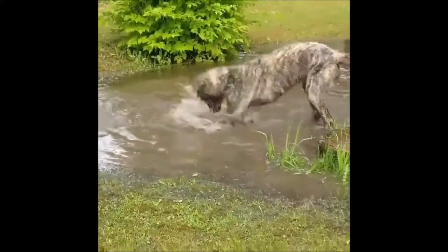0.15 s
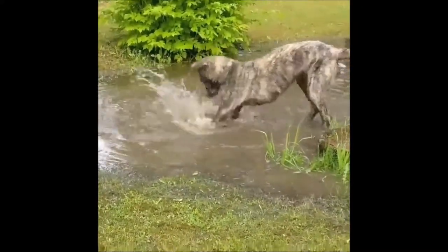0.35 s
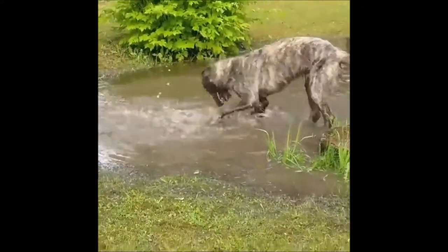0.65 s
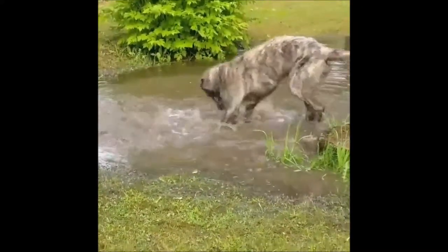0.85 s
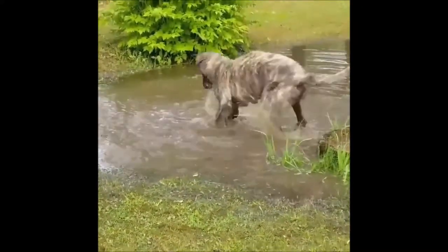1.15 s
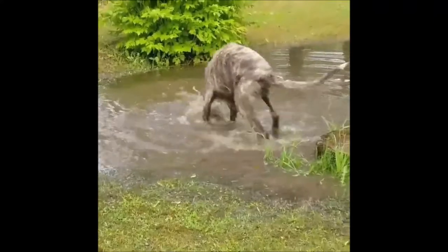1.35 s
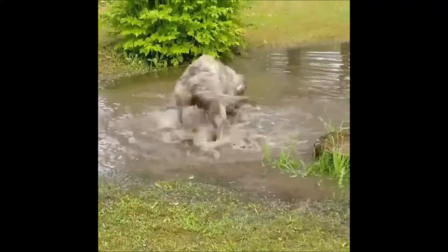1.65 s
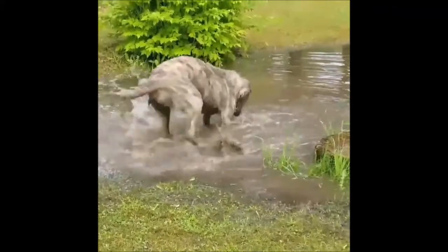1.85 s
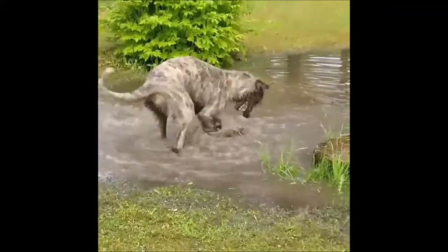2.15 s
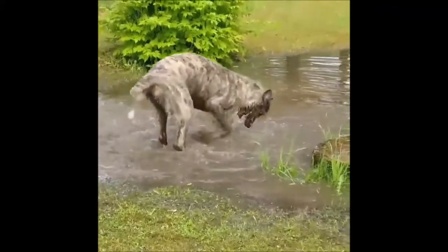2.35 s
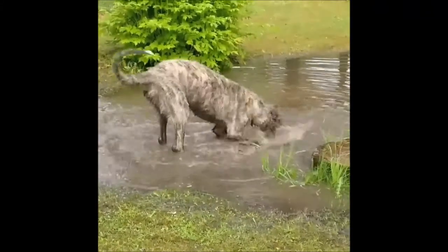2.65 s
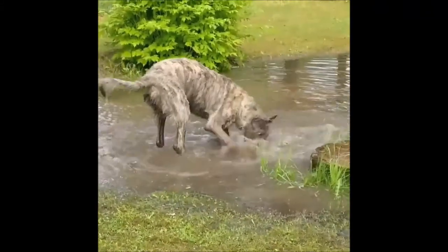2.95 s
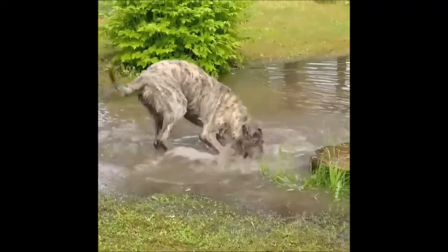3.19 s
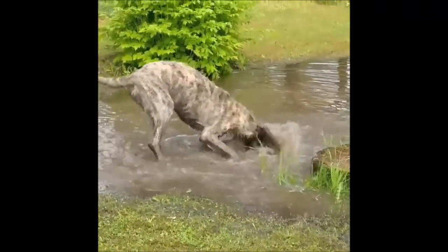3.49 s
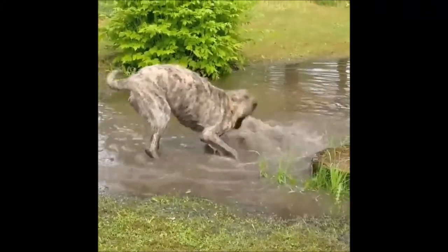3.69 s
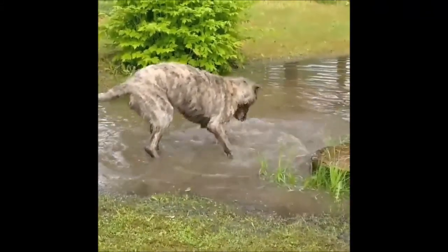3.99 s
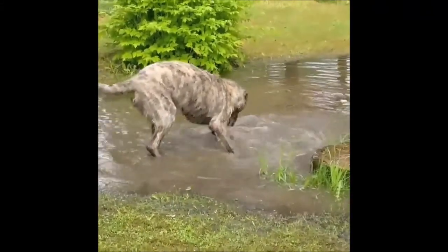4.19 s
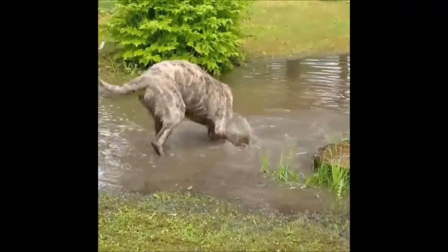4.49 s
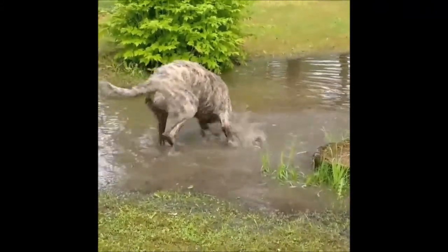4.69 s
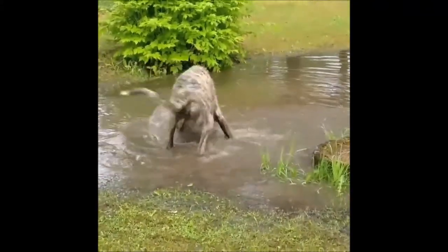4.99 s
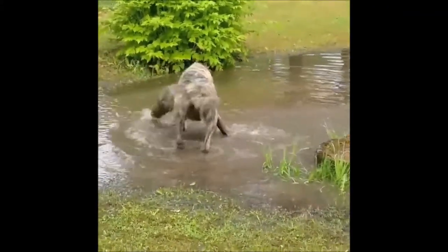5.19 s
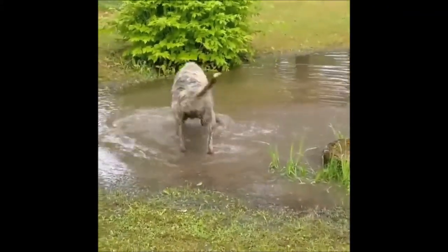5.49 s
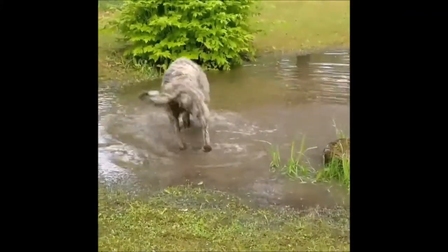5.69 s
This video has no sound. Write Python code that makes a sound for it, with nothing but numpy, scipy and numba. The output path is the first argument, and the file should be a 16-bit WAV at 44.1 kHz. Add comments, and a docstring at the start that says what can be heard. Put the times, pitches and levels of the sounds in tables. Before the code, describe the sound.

Shallow water splashes, sloshes and bubbles continuously as a large dog slaps its paws around a puddle on a lawn.

```python
"""A shallow puddle on a lawn, one microphone a few metres off. A big dog paws, stamps and dips its muzzle.
Each paw slaps the surface and drags air under: big pockets gulp, small bubbles ring, and thrown water
patters back as spray. The churned water never quite settles. It reaches the microphone with early
echoes and a slightly hollow colour; faint outdoor air lies underneath."""
import sys
import numpy as np
from scipy import signal
from scipy.fft import rfft, irfft
from scipy.io import wavfile
from scipy.ndimage import uniform_filter1d
from numba import njit

SR = 44100
rng = np.random.default_rng(int(sys.argv[2]) if len(sys.argv) > 2 else 0)


def bounce(signal):
    """Save signal as a 16-bit WAV file at the path given by the first command-line argument."""
    frames = np.transpose(np.atleast_2d(signal))
    limited = np.clip(frames, -1, 1)
    pcm = np.round(limited * 32767).astype(np.int16)
    wavfile.write(sys.argv[1], SR, pcm)


N = 257544
TIME = np.arange(N) / SR
STROKE_ATTACK_S = 0.01

# Mid-sized bubbles, from slaps and churning alike. Each row: pitch in Hz, relative level in dB.
BUBBLE_SPECTRUM = [(560, -13), (720, 1), (900, -6), (1100, -1), (1400, -12)]


def slaps(wash_db, wash_s):
    """Each slap tears a dense cloud of short-lived bubbles into the water and leaves a brief wash."""
    # Paws and sheets of water landing. Each row: peak time in seconds, half length in seconds,
    # then relative levels of bubbles, fizz and hiss in dB.
    landings = [(0.003, 0.0034, -52, -45, -68), (0.062, 0.003, -58, -33, -47.5),
                (0.136, 0.0054, -38, -38, -49.5), (0.186, 0.0058, -27.5, -27, -41),
                (0.216, 0.0066, -40, -56, -64), (0.282, 0.0085, -41.5, -62, -68),
                (0.348, 0.032, -44, -38, -49.5), (0.618, 0.011, -39, -42, -63),
                (0.74, 0.011, -49, -34.5, -48.5), (0.779, 0.011, -38, -33, -48.5),
                (0.861, 0.012, -45, -33, -53), (0.92, 0.012, -42, -38.5, -50.5),
                (0.999, 0.005, -57, -37, -71), (1.045, 0.0083, -44, -39, -50.5),
                (1.115, 0.0074, -37.5, -58, -58), (1.174, 0.016, -42, -43, -58),
                (1.246, 0.0087, -43, -47, -54), (1.326, 0.014, -40.5, -47, -60),
                (1.354, 0.0048, -38, -35, -43.5), (1.421, 0.004, -38, -48, -57),
                (1.438, 0.0057, -36, -35, -45.5), (1.517, 0.0066, -41, -38, -64),
                (1.553, 0.0071, -60, -34, -48), (1.759, 0.022, -36, -37, -49.5),
                (1.85, 0.024, -40, -52, -52.5), (1.898, 0.005, -35, -44, -47),
                (1.942, 0.013, -37.5, -45, -50), (2.049, 0.0053, -48, -39, -56),
                (2.411, 0.0095, -60, -36.5, -68), (2.507, 0.0087, -43, -39, -60),
                (2.572, 0.005, -60, -35.5, -48), (2.633, 0.0076, -39, -41, -50),
                (2.668, 0.017, -52, -37, -59), (2.755, 0.0055, -43, -34, -49.5),
                (2.771, 0.0026, -55, -36, -57), (2.798, 0.0045, -57, -39, -62),
                (2.91, 0.027, -57, -40.5, -57), (2.942, 0.0012, -49, -31, -38.5),
                (3.23, 0.0082, -54, -47, -63), (3.271, 0.01, -45.5, -42, -53),
                (3.301, 0.014, -64, -36.5, -58), (3.413, 0.0074, -48, -40.5, -68),
                (3.446, 0.009, -53, -39, -53.5), (3.573, 0.012, -42, -40, -71),
                (3.606, 0.015, -45.5, -37.5, -68), (3.735, 0.0035, -43, -41, -62),
                (3.85, 0.0046, -46, -38, -53), (4.101, 0.0056, -45.5, -37, -67),
                (4.257, 0.0035, -57, -46, -65), (4.532, 0.0041, -33.5, -32.5, -55),
                (4.542, 0.0039, -46, -35, -45), (4.773, 0.005, -48, -41, -51.5),
                (4.817, 0.018, -46.5, -42.5, -56.5), (4.91, 0.0078, -40.5, -42, -56),
                (4.94, 0.013, -40.5, -37, -46.5), (5.062, 0.0056, -41, -60, -63),
                (5.087, 0.015, -43.5, -39.5, -58), (5.309, 0.011, -45.5, -49, -52),
                (5.339, 0.0068, -45, -51, -62), (5.444, 0.0059, -49, -44, -72),
                (5.652, 0.0054, -38.5, -42, -58), (5.699, 0.006, -47, -63, -64)]
    # The small bubbles torn in. Each row: pitch in Hz, relative level in dB.
    torn_spectrum = [(1100, 5), (1350, -9.5), (1680, 12.5), (2100, -19.5), (2500, 10.5), (3200, 0),
                     (4500, 1.5)]
    power = np.zeros((3, N))
    for s, half_length, *levels in landings:
        near = slice(max(0, int((s - .1) * SR)), int((s + .2) * SR))
        t = TIME[near] - s
        burst = np.exp(-(t / half_length) ** 2)
        wash = from_db(wash_db) ** 2 * (t > 0) * np.exp(-np.abs(t) / wash_s)
        power[:, near] += from_db(levels)[:, None] ** 2 * (burst + wash)
    bubble_gain, fizz_gain, hiss_gain = np.sqrt(power)
    bubbles = swarm(BUBBLE_SPECTRUM, per_s=2700, cycles=7.7, spread_db=4.5, rise=0.053, swell_cycles=0.51)
    fizz = swarm(torn_spectrum, per_s=4400, cycles=18, spread_db=0, rise=0.081, swell_cycles=0.4)
    splat = from_db(-4.5) * noise_band(263, 790)  # the paw itself
    hiss = from_db(8.5) * noise_band(4650, 14700)  # the tearing sheet of water
    return bubble_gain * (bubbles + splat) + fizz_gain * fizz + hiss_gain * hiss


def churn(bubble_unrest, fizz_unrest):
    """Stirred water traps air: low pockets, ringing bubbles, stray plops and fizz."""
    # The largest and the smallest bubbles. Each row: pitch in Hz, relative level in dB.
    pocket_spectrum = [(125, -5), (185, -6.5), (260, 2.5), (370, 2.5), (500, -27)]
    fizz_spectrum = [(1300, -7), (1680, 2.5), (2100, -5.5), (2500, 5), (3200, 0), (3900, 2.5), (4700, -5)]
    stirred = stroke_gain("bubbles", decay_s=0.021)
    pocket_gain = np.hypot(from_db(-14) * bubble_unrest, stroke_gain("pockets", decay_s=0.029))
    bubble_gain = np.hypot(bubble_unrest, from_db(-1.5) * stirred)
    fizz_gain = np.hypot(fizz_unrest, from_db(-13) * stirred)
    pockets = swarm(pocket_spectrum, per_s=330, cycles=9.1, spread_db=2, rise=0.23, swell_cycles=3.4)
    bubbles = swarm(BUBBLE_SPECTRUM, per_s=900, cycles=9.3, spread_db=2, rise=0.15, swell_cycles=8.3)
    strays = swarm(BUBBLE_SPECTRUM, per_s=42, cycles=14, spread_db=0.5, rise=0.14, swell_cycles=1.9)
    fizz = swarm(fizz_spectrum, per_s=3000, cycles=55.6, spread_db=1.5, rise=0.1, swell_cycles=2.75)
    return pocket_gain * pockets + bubble_gain * (bubbles + from_db(-6.5) * strays) + fizz_gain * fizz


def plops():
    """Single bubbles ring out above the churn."""
    # Each row: time in seconds, relative peak in dB, pitch in Hz, cycles of ringing,
    # mean climb as a share of the pitch.
    loud_bubbles = [(0.0145, -28, 775, 6.7, 0.042), (0.029, -34, 1020, 32, 0.099),
                    (0.0604, -16, 2960, 30, 0.074), (0.161, -31, 790, 8.9, 0.11),
                    (0.3392, -29, 1870, 18, 0.13), (0.3422, -31, 920, 40, 0.041),
                    (0.402, -35.5, 734, 24, 0.0054), (0.488, -43, 1830, 18, 0.022),
                    (0.586, -30, 745, 12, 0), (0.6036, -25, 667, 17, 0.034),
                    (0.7004, -26.5, 740, 9.5, 0.086), (0.8441, -34.5, 610, 54, 0.036),
                    (0.911, -28, 880, 12, 0.13), (0.914, -26, 1600, 30, 0.17), (0.9992, -30, 1800, 36, 0),
                    (1.1304, -28.5, 1005, 18, 0.14), (1.149, -32, 900, 20, 0.35),
                    (1.165, -28, 1250, 26, 0.11), (1.171, -29, 1050, 14, 0.097),
                    (1.3489, -26, 2250, 24, 0.17), (1.4397, -24, 3400, 22, .05),
                    (1.535, -33, 1560, 16, 0.054), (1.575, -32, 1900, 22, 0.049),
                    (1.653, -34, 1640, 64, 0.0021), (2.042, -34, 1720, 18, 0),
                    (2.0783, -32, 1460, 45, 0.0039), (2.194, -34, 814, 24, 0.35),
                    (2.221, -33, 1000, 20, 0.022), (2.2359, -23, 2770, 11, 0),
                    (2.5665, -25, 1480, 15, 0.087), (2.5816, -27, 1620, 26, 0),
                    (2.6156, -30, 1190, 16, .05), (2.6238, -23, 790, 9.6, 0.17), (2.71, -33, 970, 16, 0.19),
                    (2.721, -33, 1700, 16, 0), (2.791, -32, 1780, 19, .1), (3.208, -38, 980, 57, 0.073),
                    (3.1209, -28.5, 1570, 6.5, 0.18), (3.303, -25.5, 2300, 28, 0.035),
                    (3.4551, -30.5, 1640, 60, 0.13), (3.5085, -30, 810, 17, 0.047),
                    (3.575, -31, 770, 19, 0.12), (3.776, -38, 900, 14, 0.17), (3.805, -37, 1020, 14, .1),
                    (3.833, -37, 850, 21, 0.051), (3.854, -35, 890, 11, 0), (3.9904, -37, 784, 17, 0.068),
                    (4.071, -35, 730, 11, 0), (4.165, -33, 740, 23, 0), (4.2545, -30, 980, 10, 0.01),
                    (4.3045, -35, 1100, 12, 0.018), (4.3245, -33, 1090, 13, 0.02),
                    (4.3355, -29, 1050, 22, 0.019), (4.351, -33, 1190, 9.9, .05),
                    (4.3585, -27, 1010, 19, 0.022), (4.376, -30, 965, 17, 0), (4.5287, -26, 1093, 27, 0.15),
                    (4.5417, -23.5, 1650, 27, 0.016), (4.601, -33, 3000, 36, 0), (4.646, -37, 870, 20, 0),
                    (4.661, -33, 840, 10, 0.66), (4.666, -34.5, 1610, 24, 0.45), (4.726, -37, 1900, 40, .1),
                    (4.7722, -27.5, 1560, 15, 0.047), (4.853, -37, 644, 8.9, 0.35),
                    (4.874, -37, 1760, 18, .15), (4.8929, -35, 990, 91, 0.12),
                    (5.013, -29.5, 666, 8.3, 0.092), (5.076, -23.5, 613, 3.7, 0),
                    (5.2825, -32.5, 660, 33, 0.077), (5.2835, -33, 2930, 76, 0.083),
                    (5.437, -40, 2300, 22, .1), (5.546, -36, 5270, 57, .05), (5.5609, -34, 800, 13, 0.18),
                    (5.574, -32.5, 1770, 14, 0.69), (5.577, -29, 2700, 22, 0), (5.6262, -28.5, 1610, 11, 0),
                    (5.632, -37, 1750, 18, 0.3), (5.806, -37, 3350, 30, .05), (5.819, -31, 2500, 22, 0.22)]
    return lone_bubbles(loud_bubbles, swell_cycles=2.51)


def gulps(cycles, rise):
    """The hollow behind a plunging paw closes into one big, quickly damped bubble."""
    # Each row: time in seconds, relative peak in dB, pitch in Hz.
    hollows = [(0.13, -36, 273), (0.182, -19, 284), (0.225, -32, 214), (0.269, -30, 253), (0.28, -25, 264),
               (0.727, -31, 250), (1.051, -28.5, 258), (1.135, -33, 386), (1.348, -25.5, 188),
               (1.366, -32, 346), (0.743, -30.5, 288), (0.812, -37, 262), (1.427, -31, 274),
               (1.816, -35.5, 283), (1.91, -33.5, 192), (2.525, -33.5, 262), (2.58, -34, 268),
               (2.621, -28.5, 350), (2.942, -36, 205), (3.015, -32.5, 242), (3.275, -33, 236),
               (3.446, -32, 310), (3.485, -33, 265), (3.502, -30, 290), (4.497, -25.5, 316),
               (4.818, -33.5, 350), (4.853, -31.5, 375), (5.022, -34, 402), (5.039, -29, 329),
               (5.069, -28, 376), (5.53, -40, 306), (5.568, -37, 302), (5.604, -36, 300)]
    return lone_bubbles([(*row, cycles, rise) for row in hollows], swell_cycles=1.26)


def smacks():
    """A flat hit on the water is one short midrange pressure pulse."""
    # Each row: time in seconds, peak in dB.
    flat_hits = [(0.1855, -20), (0.857, -21), (1.9082, -13.5), (2.868, -22.5), (4.532, -26), (4.772, -35),
                 (4.9305, -28)]
    return pulses(flat_hits, low_hz=810, high_hz=2180, lag_s=0.00062)


def gurgle(start_s, length_s, swell_db_per_s):
    """Bubbles of similar size break around the dipped muzzle, swelling until it is lifted."""
    # Each row: pitch in Hz, relative level in dB.
    gurgle_spectrum = [(700, -4), (960, 4), (1100, 6), (1250, 4), (1420, -9), (1750, 4), (2100, -4)]
    swell_db = swell_db_per_s * np.clip(TIME - start_s, 0, length_s)
    gain = from_db(-48.5 + swell_db) * envelope(start_s, STROKE_ATTACK_S, length_s, decay_s=0.013)
    return gain * swarm(gurgle_spectrum, per_s=900, cycles=16, spread_db=0, rise=0.034, swell_cycles=0.71)


def spray(unrest):
    """Thrown water lands after a short flight: droplets and mist merge, bigger drops patter through."""
    # Droplets and the finer mist. Each row: pitch in Hz, relative level in dB.
    droplet_spectrum = [(4600, 3), (5500, -2), (7000, 0), (8800, 1)]
    mist_spectrum = [(8400, -6.5), (10000, 1), (11200, 2.5), (13000, 1), (14500, -2)]
    thrown = stroke_gain("spray", decay_s=0.011, attack_s=0.018, delay_s=0.01)
    droplets = swarm(droplet_spectrum, per_s=3900, cycles=190, spread_db=4.5, rise=0.018, swell_cycles=8.3)
    mist = swarm(mist_spectrum, per_s=8000, cycles=160, spread_db=3.5, rise=0.034, swell_cycles=0.76)
    patter = swarm(mist_spectrum, per_s=45, cycles=12, spread_db=4, rise=0.03, swell_cycles=0.69)
    droplet_gain = from_db(-0.43) * np.hypot(slosh() * unrest, thrown)
    mist_gain = from_db(5 - 0.39 * TIME) * np.hypot(unrest, thrown)  # thins as the play goes on
    return droplet_gain * droplets + mist_gain * (from_db(-2) * mist + from_db(-10.5) * patter)


def ticks(edge_ratio):
    """Each drop landing near the microphone is one sharp pulse in a treble band of its own."""
    # Each row: time in seconds, peak in dB, band centre in Hz.
    close_drops = [(0.543, -30, 10000), (0.7618, -19, 10600), (0.9094, -24, 10000), (1.1665, -22, 10000),
                   (1.2555, -24, 10000), (1.44, -24, 10500), (1.852, -19.5, 10800), (2.0475, -22, 10100),
                   (2.9433, -17, 10900), (3.3896, -25, 10100), (4.055, -32, 8450), (4.306, -22, 12500),
                   (4.318, -17.5, 12400), (4.6595, -30, 10000), (4.6912, -22.5, 11900), (5.189, -27, 10000),
                   (5.3368, -26, 10000), (5.5423, -24, 11900), (5.547, -29, 8000)]
    return sum(pulses([(s, db)], hz / edge_ratio, hz * edge_ratio, lag_s=0.0011, order=3)
               for s, db, hz in close_drops)


def heave():
    """The mass of water pushed aside gives a soft low thud."""
    rumble = even_out(noise_band(53, 91.5), samples=3400, floor=0.15)
    return from_db(-6) * stroke_gain("heave", decay_s=0.04) * rumble


def stroke_gain(layer, decay_s, attack_s=STROKE_ATTACK_S, delay_s=0):
    """Gain of one layer as a paw or the muzzle ploughs through the water; overlaps add in power."""
    # Each row: start in seconds, length in seconds, then relative levels in dB of the four layers below.
    strokes = [(0.119, 0.19, -47.5, -61, -47.5, -55), (0.602, 0.12, -46, -59, -56, -50),
               (0.724, 0.066, -41, -41, -59, -57), (0.823, 0.042, -44, -54, -59, -64),
               (1.032, 0.13, -44.5, -43, -49, -50.5), (1.272, 0.09, -49, -50, -47, -62),
               (1.312, 0.097, -44.5, -44.5, -46, -45), (1.461, 0.072, -50, -42.5, -53, -54),
               (1.672, 0.072, -44, -54, -57, -50), (1.833, 0.11, -46.5, -55, -47, -51.5),
               (1.993, 0.049, -49.5, -57, -55, -48), (2.435, 0.046, -48, -66, -62, -53),
               (2.505, 0.15, -54, -62, -59, -53), (2.773, 0.18, -55.5, -64, -54, -49),
               (2.937, 0.15, -46, -70, -43.5, -75), (3.064, 0.23, -65, -66, -70, -48),
               (3.267, 0.058, -51, -58, -58, -60), (3.368, 0.058, -52, -49, -67, -59),
               (3.446, 0.062, -42.5, -65, -74, -67), (3.582, 0.048, -59, -50, -54, -47.5),
               (3.662, 0.21, -84, -51.5, -71, -53.5), (4.087, 0.048, -51, -57, -64, -48.5),
               (4.2, 0.21, -50.5, -54, -44.5, -56.5), (4.435, 0.12, -51.5, -45.5, -52, -53.5),
               (4.82, 0.2, -53, -54, -66, -54.5), (4.995, 0.11, -47, -48, -54, -67),
               (5.253, 0.023, -45, -43.5, -40, -58), (5.535, 0.017, -54, -58, -62, -75),
               (5.607, 0.057, -49, -47.5, -50, -54.5)]
    column = ("pockets", "bubbles", "heave", "spray").index(layer)
    power = sum((from_db(levels[column]) * envelope(s + delay_s, attack_s, length, decay_s)) ** 2
                for s, length, *levels in strokes)
    return np.sqrt(power)


def restless_water():
    """The puddle stays stirred up between strokes: gain curves for bubbles, fizz and spray."""
    # Each row: time in seconds, then relative levels of bubbles, fizz and spray in dB.
    unrest = [(0.0, -46.5, -40, -53.5), (0.25, -49, -41.5, -49), (0.33, -48, -49.5, -53),
              (0.45, -50.0, -43, -52.0), (0.6, -50, -42, -47.5), (0.73, -46, -39.5, -58),
              (0.86, -47, -43.5, -51.5), (0.97, -47, -42, -51), (1.06, -50, -40.5, -57.5),
              (1.26, -47, -40.5, -49.0), (1.4, -45.0, -37, -51), (1.56, -49, -41, -46.5),
              (1.62, -48.5, -42, -50), (1.7, -42, -40.5, -51), (1.8, -49, -37, -46.5),
              (1.93, -53, -37.5, -48), (2.07, -50.0, -38.5, -46.5), (2.15, -50, -44, -48.5),
              (2.24, -51, -41, -49.5), (2.35, -53.5, -45.5, -50), (2.57, -50.5, -40, -47.5),
              (2.73, -49, -41.5, -47.5), (2.87, -50, -40, -51), (2.97, -48.5, -41.5, -51.5),
              (3.05, -52, -47.0, -55), (3.15, -50.5, -43.5, -58.0), (3.21, -53.5, -41, -56.5),
              (3.31, -50, -43.0, -52), (3.67, -50.5, -43.5, -51.5), (3.8, -56, -43.5, -56),
              (3.91, -54, -45.5, -53), (4.04, -56.5, -51.5, -59), (4.13, -52, -45, -56.5),
              (4.19, -46.5, -46.5, -58.0), (4.3, -51, -46, -57), (4.39, -46, -43, -62),
              (4.44, -57.0, -46.0, -57.0), (4.57, -57, -40, -51.5), (4.69, -51, -47.5, -56),
              (4.81, -47, -44.5, -58.0), (4.96, -50, -44.5, -55), (5.12, -48.5, -43.5, -51.0),
              (5.39, -55.5, -47.5, -54.5), (5.54, -53, -46, -53.5), (5.6, -55, -48.5, -63.5),
              (5.7, -57, -46.5, -61), (5.8, -59.5, -49.5, -64.5)]
    times, *columns = np.transpose(unrest)
    return [from_db(np.interp(TIME, times, db)) for db in columns]


def slosh(depth_db=1.5, per_s=30):
    """A random gain that swells and sinks with each wavelet."""
    return from_db(depth_db * wander(per_s, points=1000))


def swarm(spectrum, per_s, cycles, spread_db, rise, swell_cycles):
    """Bubbles of one size class born at random, rms 1; spread_db makes a few louder than the rest."""
    low_hz, high_hz = spectrum[0][0], spectrum[-1][0]
    draws = np.random.default_rng(rng.integers(2 ** 31)).random((int(per_s * N / SR), 4))
    when, pitch, size, life = draws.T
    hz = low_hz * (high_hz / low_hz) ** pitch
    boost_db = spread_db * np.minimum(-np.log(1 - size), 4)
    heights = from_db(at_hz(spectrum, hz) + boost_db) * np.sqrt(hz)
    heights[::2] *= -1
    starts = (when * N).astype(np.int64)
    lives = cycles * 2 ** (2 * life - 1) * SR / hz
    rings = ring_bubbles(starts, 2 * np.pi * hz / SR, heights, lives, 2 * np.pi * swell_cycles, rise, N)
    rings = rms_one(band(rings, low_hz * 0.6, high_hz * 0.99))
    # the trapped air is shared out evenly over a few hundredths of a second
    return rms_one(even_out(rings, samples=900, floor=0.17))


@njit
def ring_bubbles(starts, radians_per_sample, heights, lives, swell_radians, rise, length):
    """Each bubble swells, then dies away by 60 dB over its life in samples while its pitch climbs."""
    out = np.zeros(length)
    for k in range(len(starts)):
        for i in range(min(int(lives[k]), length - starts[k])):
            age, phase = i / lives[k], radians_per_sample[k] * i
            height = heights[k] * min(1., phase / swell_radians) * np.exp(-np.log(1000) * age)
            out[starts[k] + i] += height * np.sin(phase * (1 + rise * age))
    return out


def lone_bubbles(rows, swell_cycles):
    """A large bubble pinches off over a cycle or two, then rings down while its pitch climbs."""
    out = np.zeros(N)
    for s, peak_db, hz, cycles, rise in rows:
        turn = np.arange(int(cycles * SR / hz)) * hz / SR
        shape = (1 - np.exp(-(turn / swell_cycles) ** 2)) * from_db(-60 * turn / cycles)
        ring = shape / shape.max() * np.sin(2 * np.pi * turn * (1 + rise * turn / cycles))
        add(out, s - 0.35 * swell_cycles / hz, from_db(peak_db) * ring)
    return out


def pulses(rows, low_hz, high_hz, lag_s, order=2):
    """One band-limited pressure pulse for each hit on the water."""
    out = np.zeros(N)
    pulse = band(signal.unit_impulse(512), low_hz, high_hz, order=order)
    for s, peak_db in rows:
        add(out, s + lag_s, from_db(peak_db) * pulse / np.abs(pulse).max())
    return out


def narrow_notches(x):
    """Narrow dark bands, wavering slightly in pitch, hollow out the splashing."""
    # Each row: centre in Hz, width in Hz, depth in dB, share by which the centre wavers.
    notches = [(467, 268, -7, 0.014), (2653, 370, -40, 0.013), (2700, 104, -30, .015),
               (4336, 130, -25, 0.045), (4870, 330, -36, 0.012), (6105, 245, -22, 0.03)]
    for hz, width_hz, depth_db, shift in notches:
        sway = wander(per_s=4, points=100)
        state, in_band = np.zeros(2), np.zeros(N)
        for i in range(0, N, 1024):
            block = slice(i, i + 1024)
            peak = signal.iirpeak(hz * (1 + shift * sway[i]), hz / width_hz, fs=SR)
            in_band[block], state = signal.lfilter(*peak, x[block], zi=state)
        x = x + (from_db(depth_db) - 1) * in_band
    return x


def garden(x, wet_db, t60, change_s):
    """The bank, the bush and the ripples scatter back early echoes that change as the dog moves."""
    out, t = x.copy(), TIME[:SR // 16]
    for centre_s in np.arange(0, TIME[-1] + change_s, change_s):
        near = np.abs(TIME - centre_s) < change_s
        fade = np.cos(np.pi / 2 * (TIME[near] - centre_s) / change_s)
        echoes = band(rng.standard_normal(len(t)), 150, 14000) * from_db(-60 * t / t60) * (t > .002)
        scattered = signal.fftconvolve(x[near] * fade, echoes / np.linalg.norm(echoes))
        add(out, centre_s - change_s, from_db(wet_db) * scattered)
    return out


def air(level_db):
    """Steady outdoor rumble and far hiss."""
    # Each row: frequency in Hz, relative spectral density in dB.
    air_spectrum = [(20, -24), (30, 4.5), (40, 10.5), (60, 8), (100, -1), (200, -6.5), (500, -7.5),
                    (1500, -40), (5000, -21), (14000, -72)]
    hz = np.maximum(np.fft.rfftfreq(N, 1 / SR), 1)
    shaped = rfft(rng.standard_normal(N)) * from_db(at_hz(air_spectrum, hz))
    return from_db(level_db) * rms_one(irfft(shaped, N))


def envelope(start_s, attack_s, length_s, decay_s):
    """Rise, hold until length_s, then fall to 1/e in each decay_s."""
    t = TIME - start_s
    return np.clip(t / attack_s, 0, 1) * np.exp(-np.clip((t - length_s) / decay_s, 0, 30))


def wander(per_s, points):
    """A line through random values, per_s of them a second."""
    return np.interp(TIME * per_s, np.arange(points), rng.standard_normal(points))


def even_out(x, samples, floor):
    """Steady the level by dividing by the running rms."""
    return x / np.sqrt(uniform_filter1d(x ** 2, size=samples) + floor)


def noise_band(low_hz, high_hz):
    """Band-passed noise, rms 1."""
    return rms_one(band(rng.standard_normal(N), low_hz, high_hz))


def band(x, low_hz, high_hz, order=2):
    """Butterworth band-pass."""
    sos = signal.butter(order, [low_hz, min(high_hz, SR / 2 - 500)], "band", fs=SR, output="sos")
    return signal.sosfilt(sos, x + 1e-18)


def at_hz(points, hz):
    """Read a spectrum on a log-frequency axis."""
    f, db = np.transpose(points)
    return np.interp(np.log(hz), np.log(f), db)


def from_db(db):
    """Decibels to gain."""
    return 10 ** (np.asarray(db) / 20)


def rms_one(x):
    """Scale to unit rms."""
    return x / np.sqrt(np.mean(x ** 2) + 1e-20)


def add(out, s, sound):
    """Mix a sound in at s seconds."""
    i = int(np.clip(s * SR, 0, N - 1))
    out[i:i + len(sound)] += sound[:N - i]


def scene():
    """The puddle from across the lawn, in mono; the sharpest hits and the low thud arrive without echoes."""
    bubble_unrest, fizz_unrest, spray_unrest = restless_water()
    water = churn(slosh() * bubble_unrest, slosh() * fizz_unrest) + spray(spray_unrest)
    water += gurgle(start_s=4.17, length_s=0.22, swell_db_per_s=45)
    water += slaps(wash_db=-7.5, wash_s=0.0096)
    water += plops() + from_db(-0.7) * gulps(cycles=10.8, rise=0.063)
    water = narrow_notches(garden(water, wet_db=-10, t60=0.032, change_s=0.2438))
    hits = smacks() + ticks(edge_ratio=1.39)
    return (from_db(-1.08) * water + hits + heave() + air(level_db=-60.5))[None]


def record(dry):
    """The top is cut steeply above 14 kHz."""
    return signal.sosfilt(signal.ellip(12, .1, 80, 14000, fs=SR, output="sos"), dry)


dry = scene()
out = record(dry)
bounce(out)
```